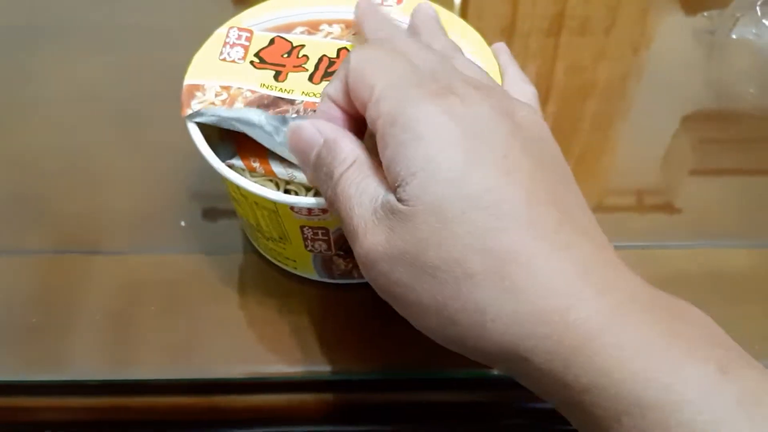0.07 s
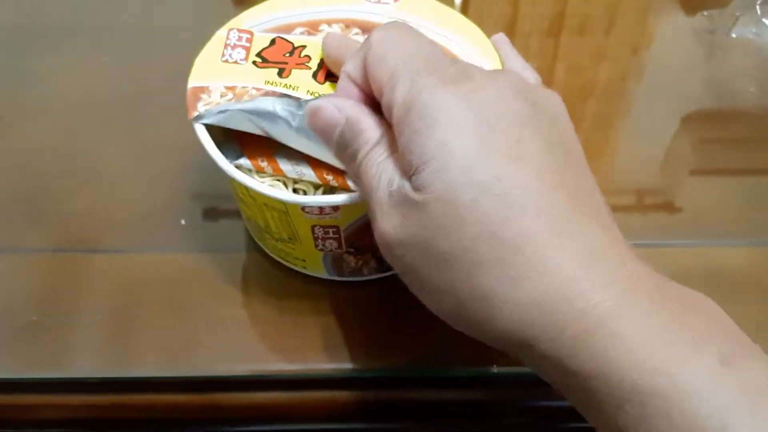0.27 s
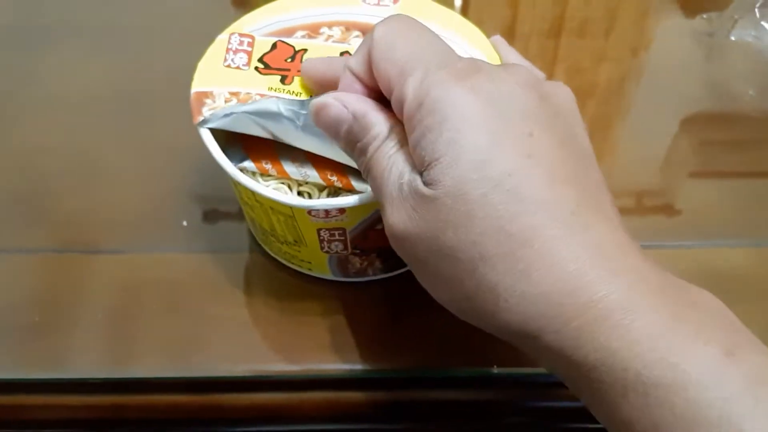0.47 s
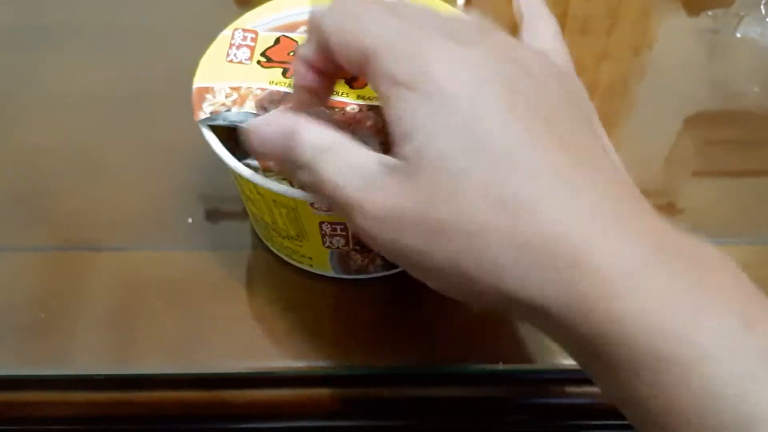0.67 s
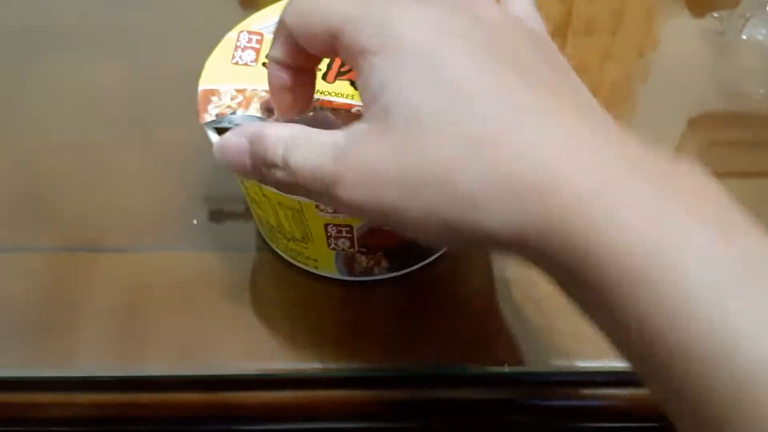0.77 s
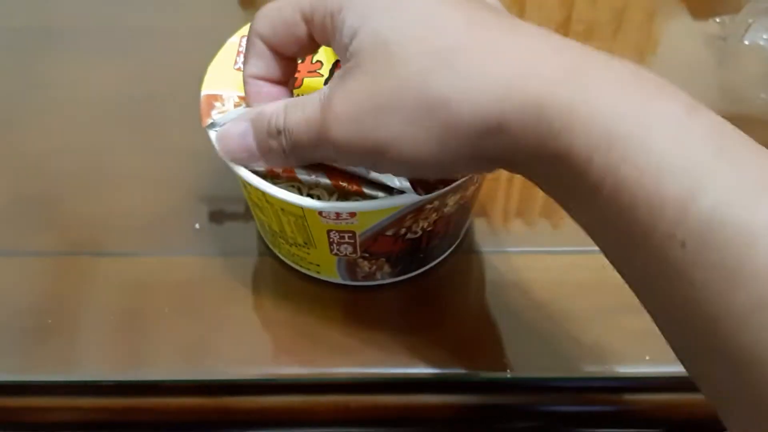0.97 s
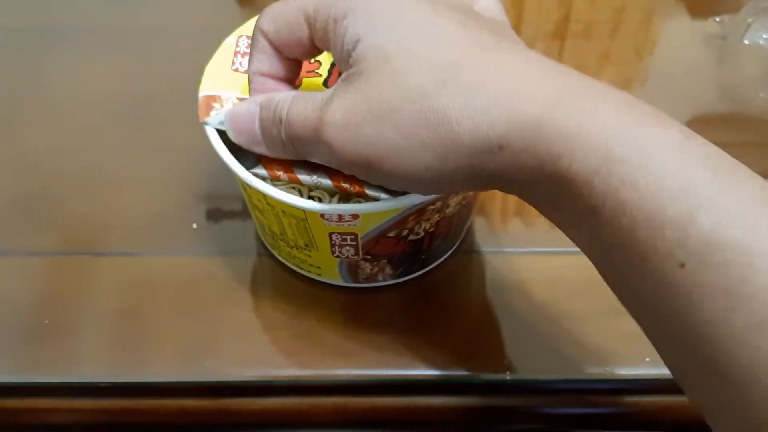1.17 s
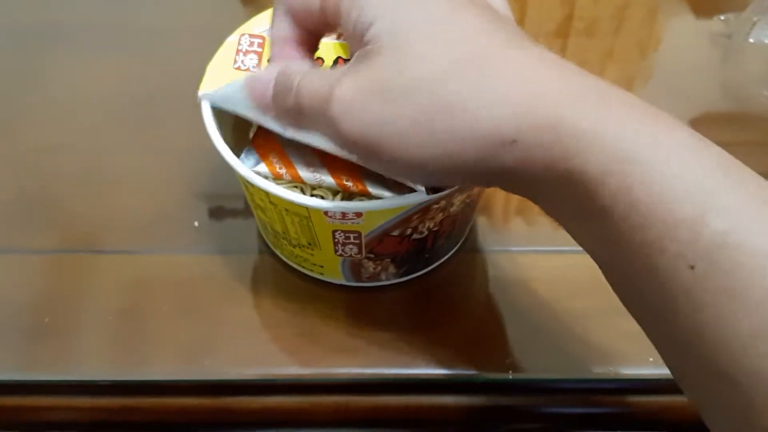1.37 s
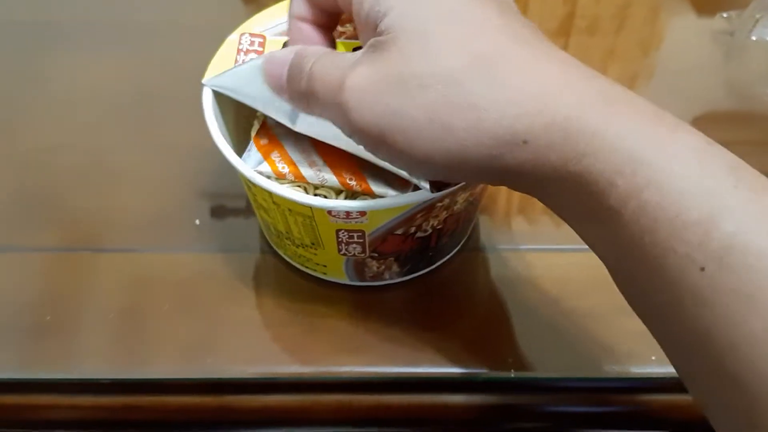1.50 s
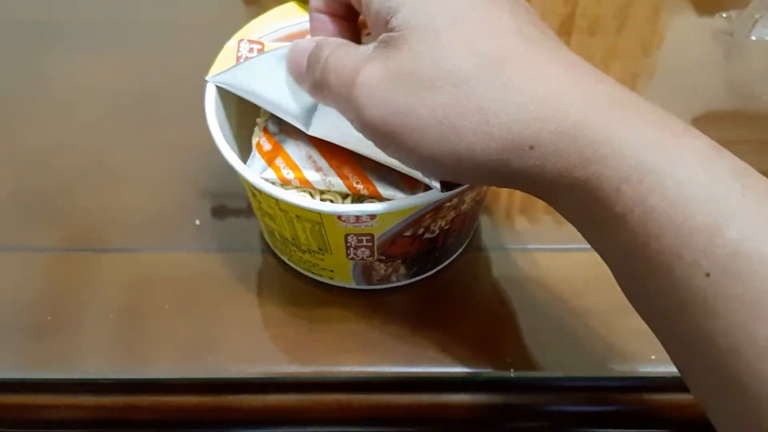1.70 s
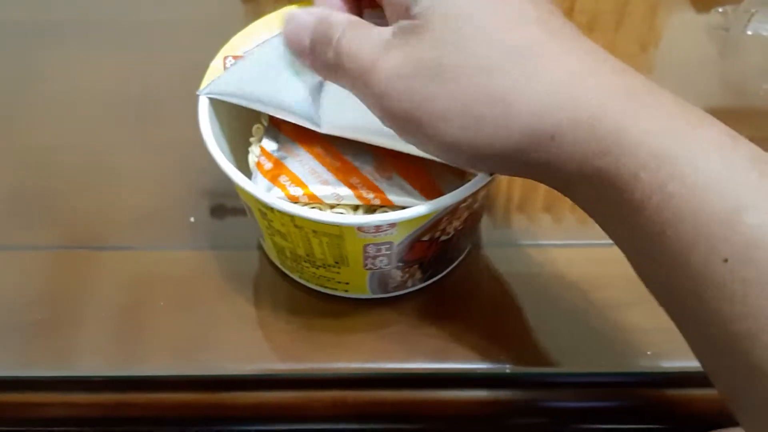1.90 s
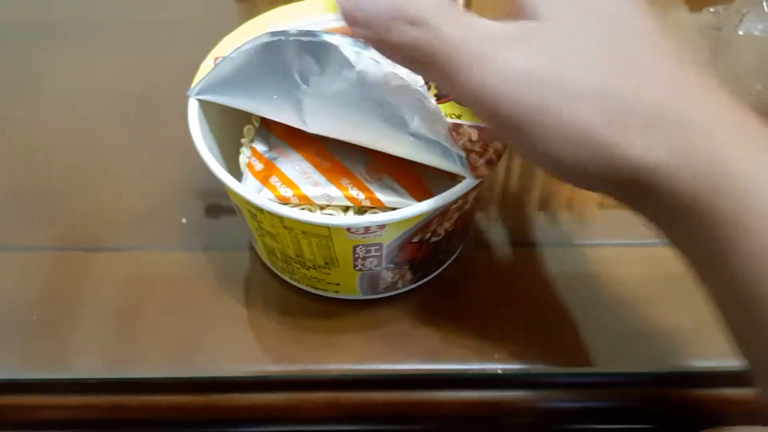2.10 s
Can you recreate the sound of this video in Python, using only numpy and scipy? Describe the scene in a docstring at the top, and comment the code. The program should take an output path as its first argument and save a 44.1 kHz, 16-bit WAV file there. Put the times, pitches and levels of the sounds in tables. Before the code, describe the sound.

A foil-lined paper lid is peeled from a paper bowl, close to a phone in a small hard room. A snap with a hollow thump comes at 0.2 s, and the sharpest rip at 0.6. Crinkling and small clicks continue unevenly from 0.8 to 1.7, then a dense, louder crackle with cup knocks peaks around 1.8 before thinning by 2 s. Faint rubbing and hush lie underneath; the left side is brighter.

```python
"""Peeling a paper cup lid

A hand peels a foil-lined paper lid off a paper cup, close to a phone in a small hard room.
The seal lets go in snaps and short rips: clumps of clicks that ring a patch of the lid.
The sheet crinkles in between as dense tiny cracks, and the hollow cup thumps as decaying sines.
Low rubbing noise, a faint hush and a short room wash lie underneath."""
import sys
import numpy as np
from scipy import signal
from scipy.fft import rfft, irfft
from scipy.io import wavfile
from scipy.ndimage import uniform_filter1d

SR = 44100
rng = np.random.default_rng(int(sys.argv[2]) if len(sys.argv) > 2 else 0)


def digitize_waveform(pressure):
    """Quantize a signal to 16-bit integers and store it at the path in sys.argv[1].

    Rows of a 2-D input are taken as channels; values are limited to [-1, 1].
    """
    field = np.atleast_2d(pressure).T
    bounded = np.clip(field, -1, 1)
    quanta = np.round(bounded * 32767).astype(np.int16)
    wavfile.write(sys.argv[1], SR, quanta)


N = 94770

# steady background noise: (frequency [Hz], level [dB])
HUSH_COLOUR = [(30, 1), (100, -16), (700, -21), (3000, -9), (6800, -48), (7600, -9)]
# decay of the room: (frequency [Hz], time to fall by 60 dB [s])
ROOM_DECAY = [(150, 0.42), (15000, 0.21)]
# the cup shuffles on the table: (time [s], level [dB])
SHUFFLE_LEVEL = [(0, -74.5), (.8, -82.5), (1.04, -70.5), (1.12, -77), (1.2, -70), (1.4, -68.5), (1.55, -77),
                 (1.75, -57.5), (1.9, -68), (2.15, -72)]
# the cup is knocked by the pull: (time [s], level [dB], pitch [Hz], low note against the wall [dB])
CUP_THUMPS = [(0.13, -39, 461, -4.5), (0.211, -21.5, 299, -57), (0.479, -40.5, 356, -23),
              (.820, -45, 410, -9), (0.866, -33, 320, -11.5), (0.8883, -23.5, 383, -52),
              (1.211, -39.5, 464, -9), (1.249, -36.5, 688, -48), (1.36, -44, 448, -6.5),
              (1.623, -44.5, 423, -10), (1.728, -31.5, 400, -3.5), (1.82, -25, 483, -19),
              (1.9394, -29.5, 339, -10), (2.041, -40, 217, -9)]
# fine crinkling of the sheet under the fingers: (time [s], level [dB])
CRINKLE_LEVEL = [(0, -69), (.05, -53.5), (.2, -55.5), (.35, -54.5), (.47, -53), (.6, -59), (.66, -44),
                 (.81, -86.5), (.83, -52.5), (.96, -42.5), (1.04, -53), (1.08, -68.5), (1.15, -51.5),
                 (1.19, -42), (1.24, -47.5), (1.3, -59), (1.39, -45), (1.48, -56.5), (1.53, -49.5),
                 (1.58, -59), (1.64, -45.5), (1.68, -56.5), (1.72, -45.5), (1.77, -40.5), (1.83, -30.5),
                 (1.88, -53), (1.92, -40.5), (2.0, -48), (2.05, -61.5), (2.15, -68)]
# broad colour of the lid as the phone's microphone hears it, with a sharp drop near 7 kHz:
# (frequency [Hz], level [dB])
HEARD_LID_COLOUR = [(60, -47.5), (150, -10.5), (430, -1), (600, -2), (1900, -4), (3300, -8.5), (6800, -12),
                    (7600, -31.5), (9700, -23), (12500, -31), (15300, -16)]
# short resonances of the lid: (frequency [Hz], width [Hz], level [dB])
LID_MODES = [(1718, 22, -9), (2370, 190, -0.5), (3366, 430, -1.5), (3970, 1620, 10), (6400, 440, 4)]
# snaps and rips of the lid: (time [s], peak [dB], treble against the middle [dB], ring [Hz], length [ms])
LID_SNAPS = [(.1294, -38, -35, 870, 19.4), (0.2115, -11, -43, 1890, 3.83), (0.2953, -30.5, -28, 4830, 3.7),
             (0.478, -28.5, -75, 1900, 4.38), (0.5228, -24, -20, 2720, 3.93),
             (0.5589, -25, -16.5, 2140, 3.3), (0.5928, -31.5, -20.5, 4750, 5.1),
             (0.6212, -7, -14, 2820, 3.9), (0.6332, -16, -10.5, 2190, 12.2), (0.817, -37.5, -29, 3570, 5.3),
             (0.8636, -22.5, -42, 2570, 5.1), (0.8877, -30.5, -50, 2280, 6.9),
             (0.9348, -26, -28, 3350, 6.5), (0.959, -23, -29.5, 4140, 8.6), (0.9692, -24, -25, 1810, 3.6),
             (1.092, -44, -19.5, 2350, 8.7), (1.1616, -31, -16.5, 1460, 10.8),
             (1.1821, -18.5, -17, 5200, 1.9), (1.2105, -30.5, -38, 4200, 19.2), (1.263, -24, -46, 1440, 4),
             (1.352, -35.5, -31, 1500, 2.8), (1.361, -29, -31, 3720, 3.4), (1.375, -28, -41, 4100, 3.4),
             (1.3824, -31.5, -22, 4120, 4), (1.394, -29.5, -45, 3720, 12.8), (1.433, -34, -44, 3570, 1.8),
             (1.4552, -30.5, -41, 2260, 5.7), (1.488, -31.5, -25, 3500, 3), (1.511, -24.5, -22, 2220, 1.12),
             (1.5849, -32, -22, 2050, 5.6), (1.6171, -30.5, -24.5, 3290, 19),
             (1.649, -24.5, -14, 1820, 4.1), (1.707, -37.5, -25, 3700, 21), (1.723, -19, -82, 1590, 6.6),
             (1.805, -24.5, -20, 1930, 6.8), (1.8181, -15.5, -23, 1890, 9.15),
             (1.855, -21.5, -24, 4570, 14), (1.8689, -23, -27, 2900, 13), (1.9296, -19, -58, 1880, 5.8),
             (1.9501, -24, -60, 4600, 4.1)]
# how much weaker the right port is: (frequency [Hz], loss [dB])
RIGHT_LOSS = [(60, 5), (380, -2), (700, 2.5), (2400, 9.5), (7000, 9.5), (8000, 0)]
# how alike the two ports are: (frequency [Hz], shared part of the amplitude [0-1])
PORT_LIKENESS = [(420, 0.95), (800, 0.32), (1400, 0.62), (3000, 0.053)]

HUSH_DB = -79.5
ROOM_DB, ROOM_LOW_DB = -9, -13  # wash above 4500 Hz and below 350 Hz
SHUFFLE_HZ, SHUFFLE_WIDTH_HZ = 107, 89
THUMP_S, THUMP_RISE_MS = 0.0082, 2.1
OVERTONE_HZ, OVERTONE_DB = 798, -2
LOW_NOTE_HZ, LOW_NOTE_T60_S = 123.4, 0.062
LID_DB = -5  # resonances against the plain sheet
CRACKS_PER_S, CRACK_SPREAD_DB = 3500, 3
CLUMP_DB, CLUMP_MS, GRAIN_DB = 2.5, 4.5, -6
CALM_DB, CALM_SPAN_DB, CALM_THIN_DB = -56, 6.5, -16.5  # under CALM_DB the crinkle is a smooth, thin hiss
RING_DB, RING_SHARE = -2.5, 0.32  # ring against the sheet, ring width as a share of its pitch
SNAP_RISE_MS, SNAP_SPREAD_DB = .75, -1  # rise of a snap 1 ms long
SPIKE_MS = 26.2  # divided by the snap's length, this is the height of its hard crack
PLAIN_TREBLE_DB = -27.5  # a snap with this treble gets no treble tilt
THIN = 0.31  # bass loss in dB per dB of treble above -38 dB
RIGHT_DIRECT, SCATTER_MS, EDGE_HZ = 0.77, 10, 15900


def amp(db):
    """Decibels to amplitude."""
    return 10 ** (np.asarray(db) / 20)


def evened(x):
    """Scale to an RMS of 1."""
    return x / np.sqrt(np.mean(x ** 2) + 1e-20)


def read(points, hz):
    """Read a frequency table, with straight lines over log frequency."""
    f, value = np.transpose(points)
    return np.interp(np.log(hz + 1), np.log(f + 1), value)


def curve(points):
    """Draw a time table as one value per sample."""
    s, value = np.transpose(points)
    return np.interp(np.arange(N) / SR, s, value)


def add(mix, s, sound):
    """Mix a sound in at s seconds, cut at the end."""
    part = mix[round(s * SR):][:len(sound)]
    part += sound[:len(part)]


def resonate(x, hz, width):
    """A decaying resonance of gain 1; a wider one dies faster."""
    r = np.exp(-np.pi * width / SR)
    return 2 * signal.lfilter([1 - r], [1, -r * np.exp(2j * np.pi * hz / SR)], x).real


def colour(x, db_at):
    """Causal (minimum-phase) filter whose level in dB is the function db_at(Hz)."""
    log_gain = np.log(amp(db_at(abs(np.fft.fftfreq(2048, 1 / SR)))))
    spectrum = np.exp(np.conj(signal.hilbert(log_gain)))
    taps = np.fft.ifft(spectrum).real[:1024]
    taps = taps.reshape((1,) * (x.ndim - 1) + (-1,))
    return signal.oaconvolve(x, taps, axes=-1)[..., :x.shape[-1]]


def hush():
    """Steady coloured noise, independent in the two ports."""
    noise = rng.standard_normal((2, N))
    return amp(HUSH_DB) * evened(colour(noise, lambda hz: read(HUSH_COLOUR, hz)))


def tail(t60_at, first, length):
    """Two noise tails of energy 1, each band dying at its own speed."""
    taps = rng.standard_normal((2, length)) * (np.arange(length) >= first)
    hz, t, z = signal.stft(taps, SR, nperseg=256)
    decay = amp(-60 * t / t60_at(hz)[:, None])
    out = signal.istft(z * decay, SR, nperseg=256)[1]
    return out / np.linalg.norm(out, axis=1, keepdims=True)


def room(x):
    """The room's short wash: many late reflections reach both ports as a dense tail."""
    tails = tail(lambda hz: read(ROOM_DECAY, hz), first=320, length=SR // 2)
    wet = signal.fftconvolve(x[None], tails, axes=1)[:, :N]
    levels = [(350, ROOM_LOW_DB), (1800, ROOM_DB - 5.5), (4500, ROOM_DB)]
    return colour(wet, lambda hz: read(levels, hz))


def shuffle():
    """Low rubbing through the table top: noise through two equal resonances."""
    rub = rng.standard_normal(N)
    for _ in range(2):
        rub = resonate(rub, SHUFFLE_HZ, SHUFFLE_WIDTH_HZ)
    return amp(curve(SHUFFLE_LEVEL)) * evened(rub)


def thump(s, db, hz, low_db):
    """The cup booms a few cycles until the hand damps it, with one higher mode and a low note via the table."""
    t = np.arange(4000) / SR
    overtone = amp(OVERTONE_DB) * np.exp(-2 * t / THUMP_S) * np.sin(2 * np.pi * OVERTONE_HZ * t)
    wall = np.exp(-(t / THUMP_S) ** 2) * (np.sin(2 * np.pi * hz * t) + overtone)
    low = amp(low_db - 60 * t / LOW_NOTE_T60_S) * np.sin(2 * np.pi * LOW_NOTE_HZ * t)
    rise = np.minimum(t * 1000 / THUMP_RISE_MS, 1)
    return s, amp(db) * rise * (wall + low)


def sheet(x):
    """The lid's short resonances, then its broad colour as the phone's microphone hears it."""
    # narrow modes are lifted
    modes = sum(amp(db) * np.sqrt(2000 / w) * resonate(x, f, w) for f, w, db in LID_MODES)
    return colour(x + amp(LID_DB) * modes, lambda hz: read(HEARD_LID_COLOUR, hz))


def cracks(draw, per_s):
    """Randomly timed clicks of either sign, a few of them large."""
    size = amp(-CRACK_SPREAD_DB * np.log(draw[2] + 0.016))
    return (draw[0] < per_s / SR) * np.sign(draw[1] - .5) * size


def crinkle():
    """Dense tiny cracks in clumps, each also ringing one patch of the lid; a gentle pull only hisses."""
    clump = evened(uniform_filter1d(rng.standard_normal(N), max(1, int(CLUMP_MS * SR / 1000))))
    clicks = cracks(rng.random((3, N)), CRACKS_PER_S) * amp(CLUMP_DB * np.minimum(clump, 2))

    # the ringing patch is drawn anew every 512 samples
    patch = rng.integers(0, len(LID_MODES), N // 512 + 1).repeat(512)[:N]
    grains = sum(amp(db) * resonate(clicks * (patch == k), f, 2 * w)
                 for k, (f, w, db) in enumerate(LID_MODES))
    crackle = evened(evened(sheet(clicks)) + amp(GRAIN_DB) * evened(grains))

    hiss = sheet(rng.standard_normal(N))
    hiss = evened(colour(hiss, lambda f: CALM_THIN_DB * (1 - np.minimum(f / 1800, 1))))
    level_db = curve(CRINKLE_LEVEL)
    busy = np.clip((level_db - CALM_DB) / CALM_SPAN_DB, 0, 1)
    return amp(level_db) * (np.sqrt(busy) * crackle + np.sqrt(1 - busy) * hiss)


def snap(s, db, treble_db, hz, ms):
    """A quick clump of cracks rings one patch of the lid; the shorter it is, the harder its main crack."""
    t = np.arange(2000) / SR * 1000  # ms
    draw = rng.random((3, len(t)))
    rise = SNAP_RISE_MS * np.sqrt(ms)  # long rips open more slowly
    shape = np.minimum(t / rise, 1) * np.exp(-(t / ms) ** 4)
    size = amp(-SNAP_SPREAD_DB * np.log(draw[1] + 0.0039))
    burst = shape * np.sign(draw[0] - .5) * size
    add(burst, rise / 1000, np.array([SPIKE_MS / ms]))

    ring = resonate(resonate(burst, hz, RING_SHARE * hz), hz, 2 * RING_SHARE * hz)
    body = evened(sheet(burst)) + amp(RING_DB) * evened(ring)

    def tone(f):
        """Treble tilt of this snap, and less bass when it is bright."""
        tilt = (treble_db - PLAIN_TREBLE_DB) * np.minimum(f / 9000, 1.2)
        return tilt - THIN * max(treble_db + 38, 0) * (1 - np.minimum(f / 1800, 1))

    toned = colour(body, tone)
    return s, amp(db) * toned / abs(toned).max()


def scene():
    """Lid and cup together, direct and through the room, over the hush."""
    lid = crinkle() + shuffle()
    for row in LID_SNAPS:
        add(lid, *snap(*row))
    for row in CUP_THUMPS:
        add(lid, *thump(*row))
    background = hush()
    wet = room(lid)
    left = lid + wet[0]
    right = RIGHT_DIRECT * lid + wet[1] / RIGHT_DIRECT
    return np.array([left, right]) + background


def record(dry):
    """The right port faces away: weaker, with scattered, later paths in the treble; then the band limits."""
    hz = np.fft.rfftfreq(N, 1 / SR)
    left, right = rfft(dry)

    # a random delay for each narrow band, summed into a phase
    knots = np.arange(0, SR / 2, 60)
    late_s = np.interp(hz, knots, rng.random(len(knots)) ** 2) * SCATTER_MS / 1000
    scatter = np.exp(-2j * np.pi * np.cumsum(late_s) * SR / N)

    same = np.clip(read(PORT_LIKENESS, hz), 0, 1)
    right = same * left + np.sqrt(1 - same ** 2) * scatter * right
    weak = amp(-read(RIGHT_LOSS, hz))
    # the two port gains always average 1
    ports = irfft(np.array([left, weak * right]) * 2 / (1 + weak), N)

    low_cut = signal.butter(2, 80, "high", fs=SR, output="sos")
    rumble_cut = signal.sosfilt(low_cut, ports)
    treble_cut = signal.firwin(511, EDGE_HZ, window=("kaiser", 9), fs=SR)
    return signal.oaconvolve(rumble_cut, treble_cut[None], "same")


dry = scene()
out = record(dry)
digitize_waveform(out)
```